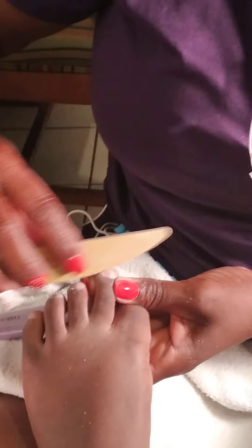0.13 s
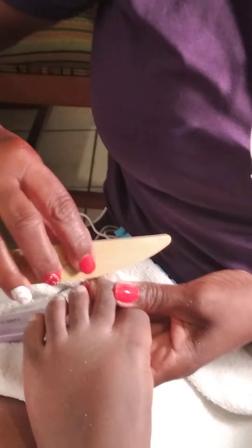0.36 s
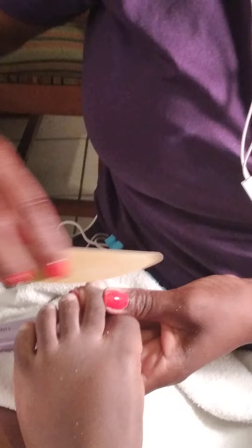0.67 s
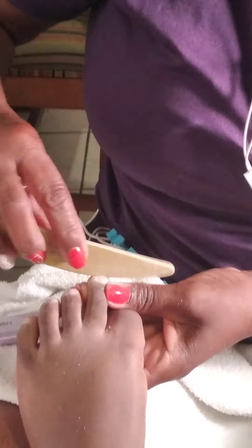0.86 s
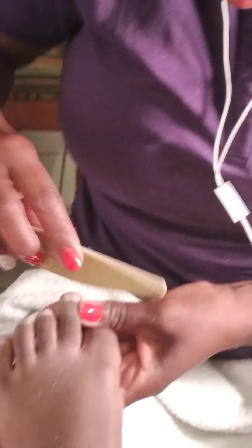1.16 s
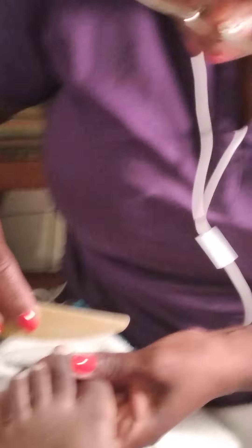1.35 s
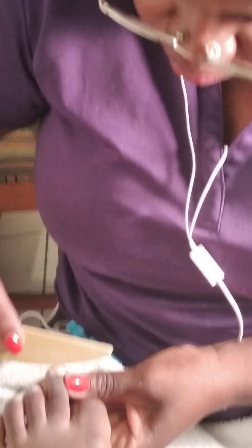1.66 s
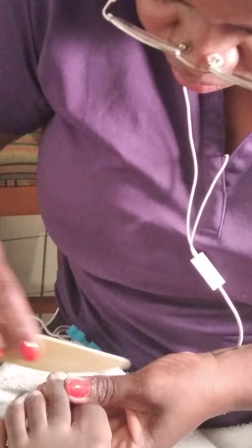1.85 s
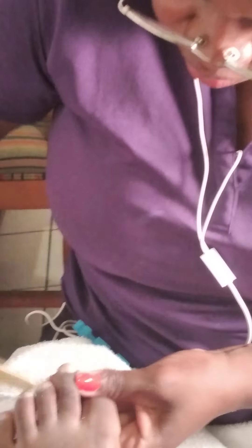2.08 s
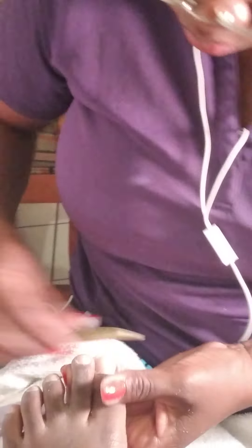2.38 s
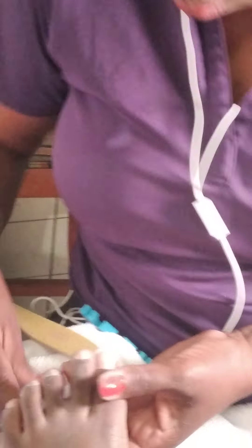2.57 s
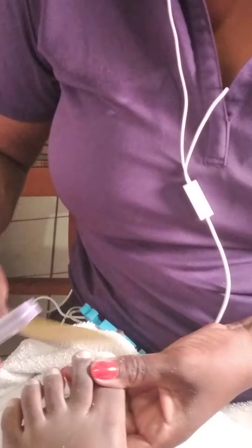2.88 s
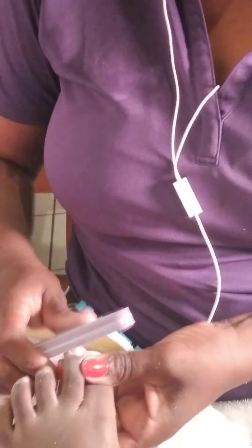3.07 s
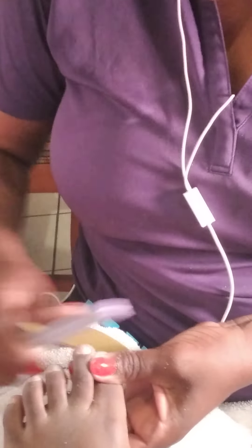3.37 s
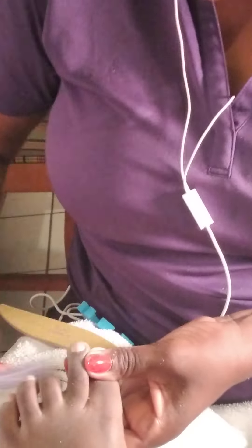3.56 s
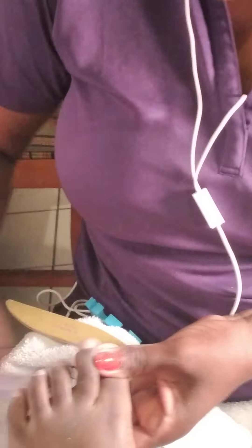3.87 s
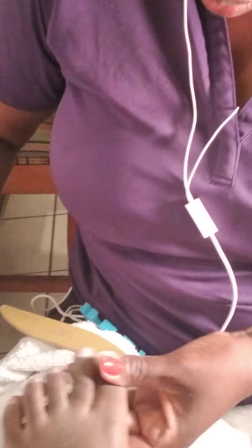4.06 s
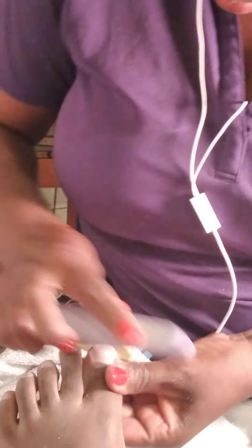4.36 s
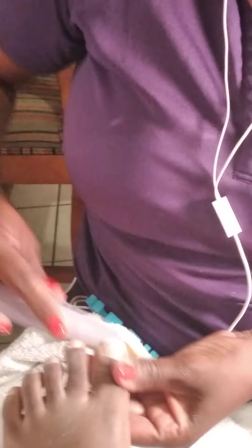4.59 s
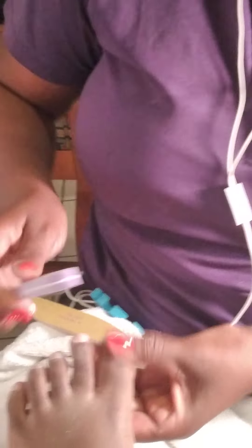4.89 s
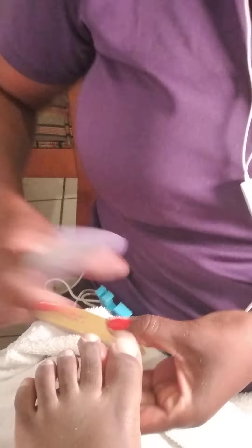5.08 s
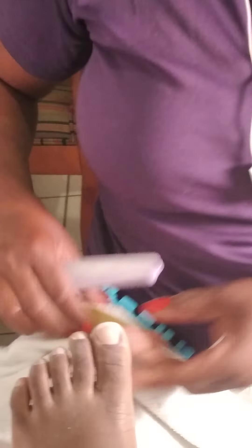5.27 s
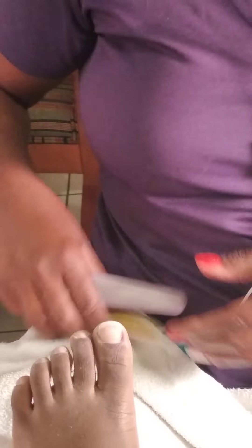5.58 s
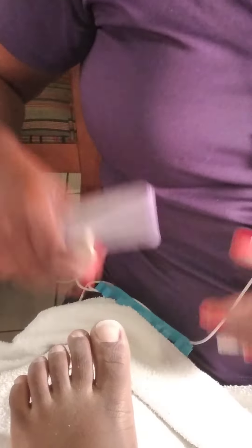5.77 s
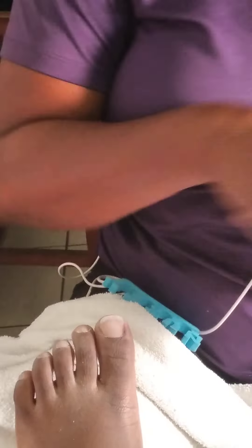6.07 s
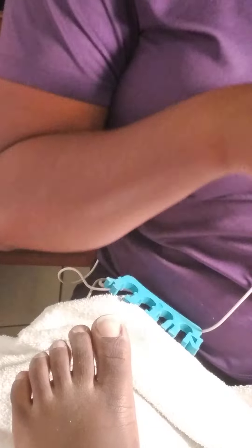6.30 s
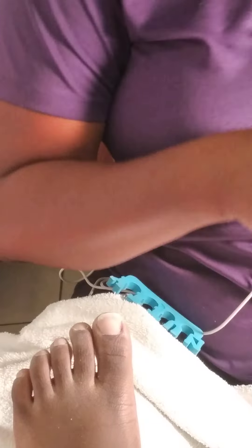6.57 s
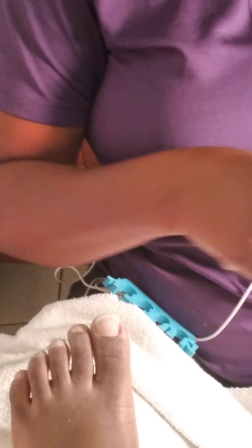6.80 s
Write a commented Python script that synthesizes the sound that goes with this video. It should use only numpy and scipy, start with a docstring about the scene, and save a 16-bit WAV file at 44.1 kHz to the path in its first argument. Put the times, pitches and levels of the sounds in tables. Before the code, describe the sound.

A continuous low fan hum and muffled airflow fill a tiled room, with a brief low puff of air on the microphone at the start. Close by, a file scratches a toenail in thin dry strokes with uneven gaps. Buffing grows stronger midway, each stroke swelling and cutting off sharply. Low bumps come after five seconds; late light scrapes lead to a short rattling tool knock.

```python
"""A nail file and then a foam buffer rasp over a toenail in short strokes, close to a two-port microphone:
clicking grit grains are shaped into body, rasp, grit and a moving ring, all following the pressure.
A fan in the tiled room gives blade tones and motor hum as sums of sines, and a rush of air as shaped noise.
A draught rumbles and puffs at the ports at the start; later come low thuds, and near the end a tool
is knocked down on a tray, where impacts and slips excite decaying modes."""
import sys
import numpy as np
from scipy import signal
from scipy.fft import rfft, irfft
from scipy.io import wavfile
from scipy.ndimage import uniform_filter1d

SR = 44100
rng = np.random.default_rng(int(sys.argv[2]) if len(sys.argv) > 2 else 0)


def to_wav(s):
    """Save 16-bit WAV."""
    ch = np.atleast_2d(s).T  # columns
    pcm = np.round(np.clip(ch, -1, 1) * 32767)  # PCM
    wavfile.write(sys.argv[1], SR, pcm.astype(np.int16))


N = 305921  # length in samples


def amp(db):
    """Logarithmic level: converts decibels to an amplitude gain."""
    return 10 ** (np.asarray(db) / 20)


def evened(x):
    """Normalisation: scales a signal to rms 1."""
    return x / np.sqrt(np.mean(x ** 2) + 1e-20)


def read(points, hz):
    """Interpolation: reads a table on a log-frequency axis."""
    f, value = np.transpose(points)
    return np.interp(np.log(hz + 1), np.log(f + 1), value)


def coloured(x, spectrum):
    """Linear filtering: multiplies the spectrum of a signal by the gains of a table."""
    hz = np.fft.rfftfreq(N, 1 / SR)
    return irfft(rfft(x) * amp(read(spectrum, hz)), N)


def smoothed_noise(count, size):
    """Low-pass noise: two moving averages leave slow random swings of rms 1."""
    once = uniform_filter1d(rng.standard_normal(count), size=size)
    return evened(uniform_filter1d(once, size=size))


def drift(top_hz):
    """Superposition: sines of random phase, up to top_hz, add to a slow wander of rms 1."""
    t = np.arange(0, N / SR + .01, .005)
    rates_hz = top_hz * np.geomspace(.05, 1, 16)
    slow = sum(np.sin(2 * np.pi * (f * t + rng.random())) for f in rates_hz)
    return np.interp(np.arange(N) / SR, t, evened(slow))


# Relative spectrum of the rush of air: (f/Hz, density level/dB)
RUSH_SPECTRUM = [(15, -9), (34, -10), (55, -4), (90, -5), (280, -6), (370, -12), (550, -12.5), (1000, -14),
                 (1500, -17), (2100, -17), (2500, -21), (2800, -30), (3100, -41), (3400, -48.5),
                 (3800, -73.5)]
# Room modes fed by the air: (f/Hz, width/Hz, level/dB)
ROOM_MODES = [(24.5, 3.3, -53), (48.6, 8, -63.5), (114.1, 9.1, -57), (130.3, 3.9, -62), (149.2, 4.1, -58.5),
              (183, 7.5, -56.5), (218.5, 11, -59), (234, 77, -62), (330, 22, -61.5), (472, 19, -68),
              (665, 49, -67.5), (811, 71, -67)]
# Likeness of the two ports: (f/Hz, left-right correlation)
PORT_LIKENESS = [(30, .95), (90, .97), (180, .98), (330, .86), (500, .62), (800, .2), (1290, -.12),
                 (2380, -.04), (4400, 0)]
# Relative spectrum of the faint hiss: (f/Hz, density level/dB)
HISS_SPECTRUM = [(2500, -5.5), (3500, 2.5), (5000, 1), (6500, 1), (8000, -2), (10500, -7), (12000, -8.5),
                 (16000, -5)]
RUSH_DB, HISS_DB = -51, -84.5
RIPPLE_DB = 1.1  # rms depth of the random peaks and dips


def air():
    """Partial coherence: noise alike in both ports mainly in the bass, with room modes and hiss added in power."""
    hz = np.fft.rfftfreq(N, 1 / SR)
    a, b, c, d = rng.standard_normal((4, len(hz)))
    same = np.clip(read(PORT_LIKENESS, hz), -1, 1)
    left = a + 1j * b
    right = same * left + np.sqrt(1 - same ** 2) * (c + 1j * d)

    rush = amp(read(RUSH_SPECTRUM, hz)) * (hz < RUSH_SPECTRUM[-1][0])
    power = amp(RUSH_DB) ** 2 * rush ** 2 / np.sum(rush ** 2)
    for f, width, db in ROOM_MODES:
        bump = 1 / (1 + (2 * (hz - f) / width) ** 4)
        power = power + amp(db) ** 2 * bump / bump.sum()
    # standing waves between the tiles leave random peaks and dips; doubled because amp acts on power here
    ripple = smoothed_noise(len(hz), 110)
    power = power * amp(2 * RIPPLE_DB * ripple * (hz > 350))

    hiss = amp(read(HISS_SPECTRUM, hz)) * (hz > HISS_SPECTRUM[0][0])
    power = power + amp(HISS_DB) ** 2 * hiss ** 2 / np.sum(hiss ** 2)
    noise = irfft(np.array([left, right]) * np.sqrt(power), N) * N / 2
    return noise * amp(0.5 * drift(3.))


# Rotation of the fan shaft: (t/s, turns per second)
SHAFT_SPEED = [(0, 21.74), (2.5, 21.78), (5, 21.73), (7, 21.67)]
# Blade tones, mostly multiples of the three blades: (multiple of the shaft rate)
BLADE_ORDERS = [3, 6, 9, 15, 18, 19, 21, 24, 27, 36, 39, 45]
# Phase by which the left port leads, one for each blade tone: (phase/rad)
BLADE_LEADS = [.08, .04, .08, -.3, -.5, -.6, -1.15, -.9, -1.2, 1.2, 1.1, 1.3]
# Strength of each blade tone: (rms level/dB)
BLADE_LEVELS = [-51, -56, -52, -56, -70, -68.5, -63, -70.5, -65, -72.5, -69.5, -71]
LATE_ORDER, LATE_S, LATE_RISE_S = 42, 5.8, .25  # one blade tone grows late
EARLY_DB, LATE_DB = -72.5, -66
MOTOR_HZ = 240.2
MOTOR_DB, BELOW_DB, ABOVE_DB = -52, -64.5, -53.5  # motor hum and its sidebands, one shaft turn away
WAVER_DB = 1.5  # rms wander of each tone's level


def fan():
    """Harmonics and sidebands: blade tones are multiples of shaft speed, which also flanks the motor hum."""
    t = np.arange(N) / SR
    shaft = 2 * np.pi * np.cumsum(np.interp(t, *np.transpose(SHAFT_SPEED))) / SR
    motor = 2 * np.pi * MOTOR_HZ * t
    late_db = np.interp(t, [LATE_S, LATE_S + LATE_RISE_S], [EARLY_DB, LATE_DB])

    tones = [(k * shaft, db, lead) for k, db, lead in zip(BLADE_ORDERS, BLADE_LEVELS, BLADE_LEADS)]
    tones += [(LATE_ORDER * shaft, late_db, 1.1)]
    tones += [(motor, MOTOR_DB, .3), (motor - shaft, BELOW_DB, .2), (motor + shaft, ABOVE_DB, -.25)]
    out = np.zeros((2, N))
    for angle, db, lead in tones:
        angle = angle + 2 * np.pi * rng.random()
        peak = np.sqrt(2) * amp(db + WAVER_DB * drift(4.))
        out += peak * np.sin([angle + lead / 2, angle - lead / 2])
    return out


# Relative spectrum of the air buffeting the ports: (f/Hz, density level/dB)
BUFFET_SPECTRUM = [(10, -9.5), (25, 6), (60, -6), (110, -20.5), (200, -50.5), (400, -130)]
DRAUGHT_DB, DRAUGHT_FALL_DB_PER_S, STILL_DB = -46, 20., -64  # dies down to a faint stir


def draught():
    """Turbulence: pressure fluctuations at the ports are low rumble, unrelated left and right."""
    rumble = evened(coloured(rng.standard_normal((2, N)), BUFFET_SPECTRUM))
    dying = amp(DRAUGHT_DB - DRAUGHT_FALL_DB_PER_S * np.arange(N) / SR)
    return np.hypot(dying, amp(STILL_DB)) * rumble


def pressure_pushes(events):
    """Short tone burst: each push is a low sine that starts downward under a Hann window."""
    out = np.zeros((2, N))
    for s, db, hz, cycles, pan_db in events:
        u = np.arange(0, cycles / hz, 1 / SR)
        push = -amp(db) * np.sin(2 * np.pi * hz * u) * np.hanning(len(u))
        out[:, round(s * SR):][:, :len(u)] += amp([[pan_db / 2], [-pan_db / 2]]) * push
    return out


# Puffs of air, mainly on one port: (t/s, level/dB, f/Hz, cycles, left minus right/dB)
AIR_PUFFS = [(.0135, -32, 62, 2.1, -22), (.160, -43, 50, 1.3, 20), (.2385, -39, 85, 1.6, -22)]


def puffs():
    """Near-field pressure: a puff of air pushes mainly one port for one or two low cycles."""
    return pressure_pushes(AIR_PUFFS)


# Strokes: (end t/s, swell/s, easing/s, top pressure level/dB, pressure level at the end/dB,
# dull body of the tool re rasp/dB, fine grit re rasp/dB, ring of the nail edge at top pressure f/Hz)
FILE_STROKES = [(.797, 0.041, .014, -75, -78, -6, -4, 6050), (.927, 0.062, .012, -72, -73, -8, -3, 6460),
                (1.06, 0.056, 0.023, -68, -77, -12, -4, 7000),
                (1.216, .02, 0.033, -72.5, -75, -8, -2.5, 6400),
                (2.138, 0.069, 0.046, -64, -74, -14, -1.5, 6500),
                (2.676, 0.047, .012, -71.5, -79, -7, -7, 5890),
                (2.771, .025, .058, -71.5, -80, 2.5, -7, 5900),
                (3.376, 0.078, 0.12, -52, -74, -10, -8.5, 5700),
                (3.702, 0.079, 0.1, -56, -74, -3, -10.5, 5440),
                (4.02, 0.073, 0.091, -50.5, -72, -8.5, -12.5, 5700),
                (4.189, 0.18, 0.077, -59.5, -70, -16, -8.5, 5900),
                (4.33, 0.029, .078, -67.5, -71, -8, -7, 5900),
                (4.64, 0.076, 0.1, -54.5, -63, -16, -7, 6700),
                (4.7, 0.032, .044, -52.5, -73, -29, -4.5, 6200),
                (4.776, .085, 0.046, -61.5, -70, -18, -8, 5950),
                (4.847, 0.057, .014, -69, -76, -12, -7, 6150), (6.261, 0.1, 0.09, -63, -70, -11, -3, 6350),
                (6.35, .012, .014, -70, -76.5, -11, -10, 6580),
                (6.426, 0.08, .024, -68, -74, -11, -3, 6250), (6.78, 0.032, 0.02, -75, -77, -10, 1, 5900),
                (6.872, 0.028, 0.083, -63.5, -75, 2, -5.5, 5500)]
# Faint brushes that swell and stop: (end t/s, level/dB, length/s)
FAINT_BRUSHES = [(0.244, -79, 0.022), (.382, -79, .006), (.53, -80, .016), (1.073, -80, .012),
                 (1.935, -77.5, 0.024), (2.898, -76.5, 0.026), (2.945, -78.5, 0.022), (3.011, -77, 0.026),
                 (3.469, -80, .015), (4.464, -79, .02), (4.935, -77.5, 0.025), (5.215, -82, .008),
                 (5.272, -74.5, 0.031), (5.412, -79, .012), (5.753, -78, .019), (5.819, -77, 0.031)]
# The tool snags on the nail edge: (t/s, level/dB, half length/s)
EDGE_SNAGS = [(1.036, -70, .003), (1.18, -74, .003), (2.69, -75, .003), (2.759, -70, .003),
              (3.608, -47.5, 0.0027), (3.955, -52, 0.0036), (4.041, -66, .003), (4.111, -59, 0.0075),
              (4.654, -53.5, 0.005), (4.73, -65, .005), (6.123, -65, 0.0037)]
# pressure swells from a light touch to a rounded top, then eases off
TOUCH_DB, RISE_BEND, FALL_BEND = -82, 1.66, 1
LANDING_S = 0.013  # the tool settles gently on the nail
BODY_LAG, GRIT_LAG = 0.39, .1  # share of a pressure change that body and grit do not follow
RING_REST_HZ = 6500  # the nail edge at rest
RING_RISE_HZ_PER_DB = 8.  # the ring rises as the pressure eases


def contact():
    """Contact pressure: sets layer levels and the ring's pitch; each stroke's rasp cuts off sharply at its end."""
    t = np.arange(N) / SR
    level = np.zeros((3, N))  # body, rasp, grit
    ring_hz = np.full(N, RING_REST_HZ, float)
    for end, swell, easing, top_db, end_db, body_db, grit_db, hz in FILE_STROKES:
        touch = end - easing - swell
        on = slice(round(touch * SR), round(end * SR))
        rise = np.clip((t[on] - touch) / swell, 0, 1)
        fall = np.clip((t[on] - touch - swell) / easing, 0, 1)
        # decibels below the top pressure
        eased_db = (top_db - TOUCH_DB) * (1 - rise) ** RISE_BEND
        eased_db = eased_db + (top_db - end_db) * fall ** FALL_BEND
        layers_db = top_db + np.array([body_db - (1 - BODY_LAG) * eased_db,
                                       -eased_db,
                                       grit_db - (1 - GRIT_LAG) * eased_db])
        landing = np.clip((t[on] - touch) / LANDING_S, 0, 1)
        level[:, on] = np.hypot(level[:, on], amp(layers_db) * landing)
        ring_hz[on] = hz + RING_RISE_HZ_PER_DB * eased_db

    brush_shares = amp([[-8.], [0], [-7.]])
    for end, db, length in FAINT_BRUSHES:
        on = slice(round((end - length) * SR), round(end * SR))
        level[:, on] += brush_shares * amp(db - 5.8 * (end - t[on]) / length)

    snag_shares = amp([[-9.], [0], [-4.]])
    for s, db, half in EDGE_SNAGS:
        on = slice(round((s - .03) * SR), round((s + .03) * SR))
        snag = amp(db) * np.exp(-((t[on] - s) / half) ** 2)
        level[:, on] = np.hypot(level[:, on], snag_shares * snag)
    return uniform_filter1d(level, size=60, axis=1), ring_hz


def resonate(x, hz, width_hz):
    """Heterodyning: shifts the curve hz down to zero, smooths twice and shifts back, a moving resonance."""
    turn = np.exp(2j * np.pi * np.cumsum(hz) / SR)
    r = np.exp(-np.pi * width_hz / SR)
    return (turn * signal.lfilter([1], np.convolve([1, -r], [1, -r]), x / turn)).real


# Relative spectrum of the dull body of the tool: (f/Hz, gain/dB)
BODY_BAND = [(1800, -10.5), (2800, -5), (3800, -12), (4800, -9.5), (6000, -27.5)]
# Relative spectrum of the rasp: (f/Hz, gain/dB)
RASP_BAND = [(3000, -11.5), (4500, -2), (5500, 0), (7000, 2.5), (8500, -6), (10000, -42)]
# Relative spectrum of the fine grit: (f/Hz, gain/dB)
GRIT_BAND = [(7000, -35.5), (9000, 1.5), (12000, -3.5), (13500, -11), (15500, -8), (17000, -2)]
RASP_DB, RING_DB = -1.0, -9  # the rasp layer is this broad noise plus the ring
RING_WIDTH_HZ, RING_WANDER = 1400, .06  # width of each smoothing pass; wander as rms share of the pitch
GRAINS_PER_S, GRAIN_SPREAD_DB = 16000, 2.2


def filing(clump_db=1.0, shared=0.3):
    """Stochastic excitation: grit grains click on the nail in clumps; each port hears partly the same grains."""
    spread_db = GRAIN_SPREAD_DB * np.minimum(rng.exponential(1, (3, N)), 5)
    size = amp(spread_db) * rng.choice([-1., 1.], (3, N))
    grains = size * (rng.random((3, N)) < GRAINS_PER_S / SR)
    shared = np.clip(shared, 0, 1)
    ports = shared * grains[0] + np.sqrt(1 - shared ** 2) * grains[1:]
    clumps = smoothed_noise(N, 90)

    level, ring_hz = contact()
    body, rasp, grit = (evened(coloured(ports, band)) for band in (BODY_BAND, RASP_BAND, GRIT_BAND))
    wandering_hz = ring_hz * (1 + RING_WANDER * drift(40.))
    ring = evened(resonate(ports, wandering_hz, RING_WIDTH_HZ))
    rasp = amp(RASP_DB) * rasp + amp(RING_DB) * ring
    return amp(clump_db * clumps) * (level[0] * body + level[1] * rasp + level[2] * grit)


# Dull thuds nearby: (t/s, level/dB, f/Hz, cycles, left minus right/dB)
DULL_THUDS = [(5.075, -39, 140, 12., 2), (5.17, -42, 195, 13., 0), (5.27, -43, 245, 22., 0)]


def thuds():
    """Low tone burst: each dull thud swells and fades over a dozen or more cycles."""
    return pressure_pushes(DULL_THUDS)


# Modes of the tray: (f/Hz, level/dB, 60 dB decay time/s)
TRAY_MODES = [(800, -9, .012), (1150, -7, .008), (1500, -4, .008), (1800, -4, .01), (2200, -6, .006),
              (2650, -9, .005)]
# Chatter on the tray: (t/s, level/dB)
TRAY_CHATTER = [(6.779, -46), (6.80, -50), (6.845, -51.5), (6.87, -63)]
# Knock and bounces: (t/s, level/dB, left minus right/dB)
TRAY_KNOCKS = [(6.776, -33, 0), (6.7835, -38, 0), (6.7915, -37, 3), (6.7995, -36, 4)]
# Dull colour of the tray sound, little treble above 2.5 kHz: (f/Hz, gain/dB)
TRAY_COLOUR = [(2200, 0), (2800, -10), (3600, -20)]
RISE_S = .0004  # time constant of the soft contact


def tray(slips_per_s=5000.0):
    """Modal synthesis: knocks and random slips excite the decaying modes of the tray."""
    s, db = np.transpose(TRAY_CHATTER)
    t, u = np.arange(N) / SR, np.arange(4000) / SR
    ring = sum((-1) ** k * amp(mode_db - 60 * u / t60) * np.sin(2 * np.pi * hz * u)
               for k, (hz, mode_db, t60) in enumerate(TRAY_MODES))
    ring = ring * (1 - np.exp(-u / RISE_S))  # a soft contact keeps the treble out

    slips = rng.standard_normal((2, N)) * (rng.random(N) < slips_per_s / SR)
    slips = slips * (t > s[0]) * (t < s[-1])
    drive = slips * amp(np.interp(t, s, db)) / np.sqrt(slips_per_s / SR * np.sum(ring ** 2))
    for at, knock_db, pan_db in TRAY_KNOCKS:
        ports_db = knock_db + np.array([pan_db, -pan_db]) / 2
        drive[:, round(at * SR)] += amp(ports_db) / abs(ring).max()
    return coloured(signal.oaconvolve(drive, ring[None], axes=1)[:, :N], TRAY_COLOUR)


def scene():
    """Superposition: the pressures of all sources add at the two ports."""
    return air() + fan() + draught() + puffs() + filing() + thuds() + tray()


# Cavity of the left port: (f/Hz, gain/dB)
LEFT_CAVITY = [(200, 0.25), (700, 1.3), (1300, 8), (3000, 2.5), (4500, 0.5), (6500, 3), (8500, -3),
               (10500, -6.5), (13000, -2.5), (15500, -3.5)]
# Cavity of the right port: (f/Hz, gain/dB)
RIGHT_CAVITY = [(200, -0.9), (700, 1.33), (1300, 6), (3000, 2), (4500, -2.5), (6500, -7.5), (8500, -4.5),
                (10800, 7), (13000, -2.5), (15500, -2)]
EDGE_HZ = 15710  # upper band limit


def record(dry):
    """Frequency response: each port's cavity colours the sound, then a steep low-pass limits the band."""
    heard = np.array([coloured(dry[0], LEFT_CAVITY), coloured(dry[1], RIGHT_CAVITY)])
    low_pass = signal.firwin(2047, EDGE_HZ, window=("kaiser", 9), fs=SR)
    return signal.oaconvolve(heard, low_pass[None], "same")


dry = scene()
out = record(dry)
to_wav(out)
```